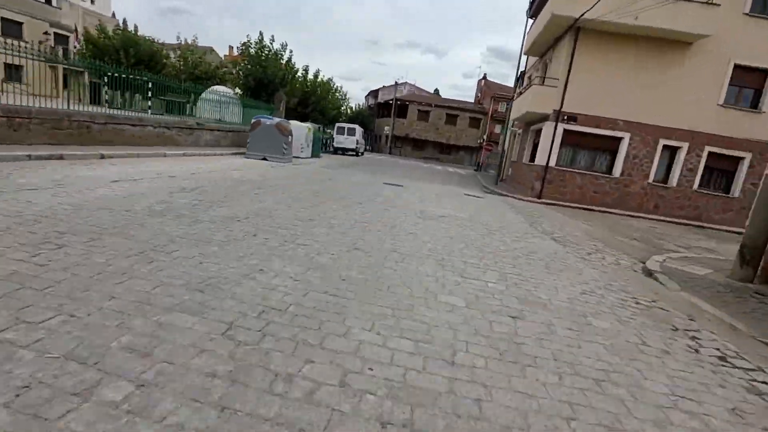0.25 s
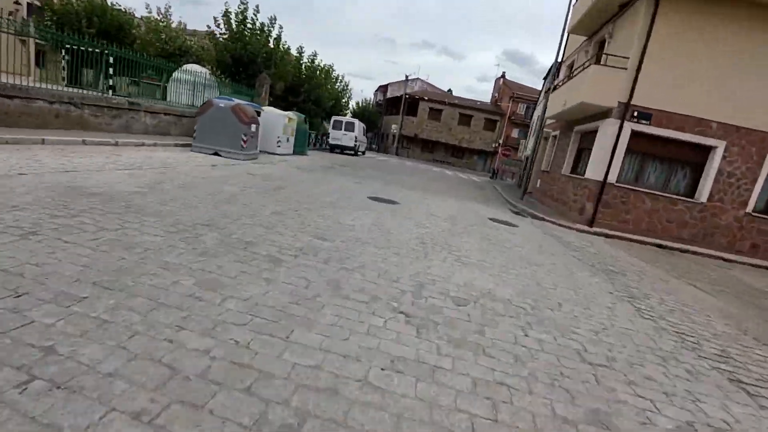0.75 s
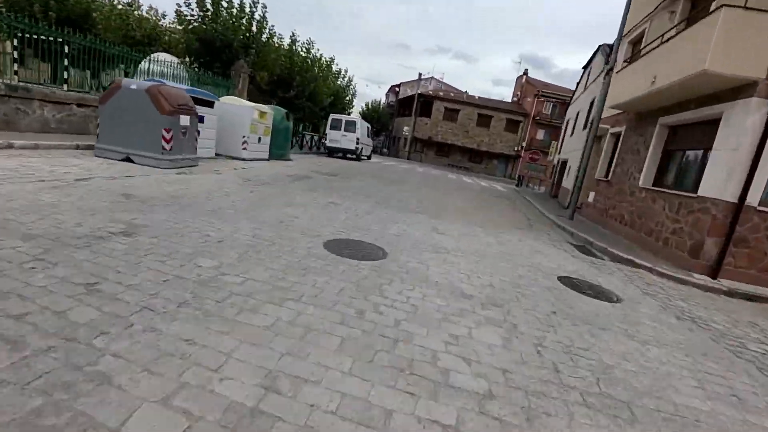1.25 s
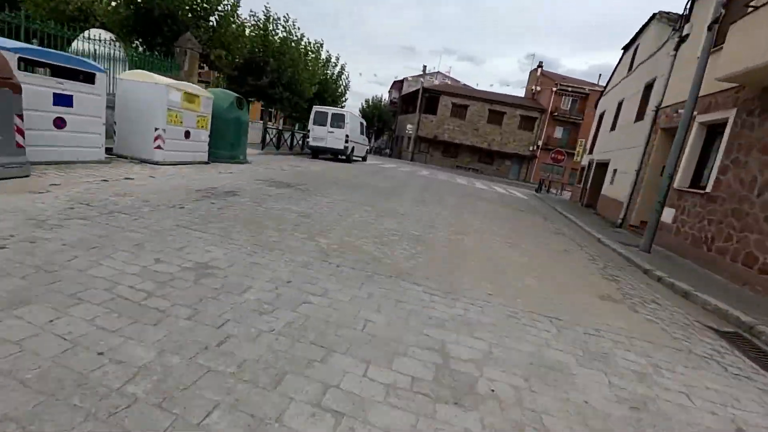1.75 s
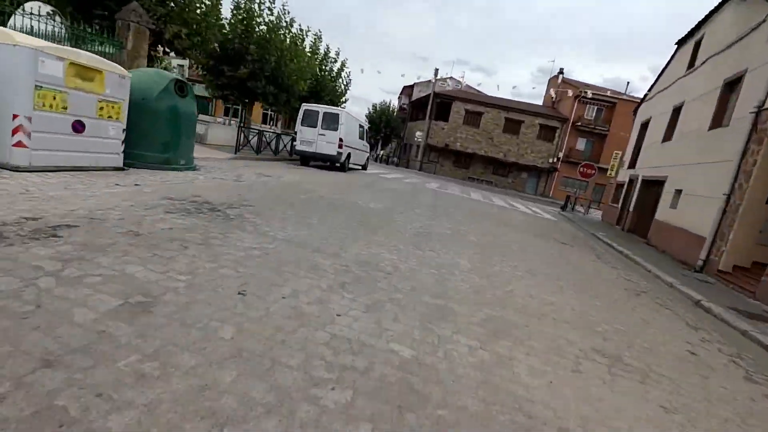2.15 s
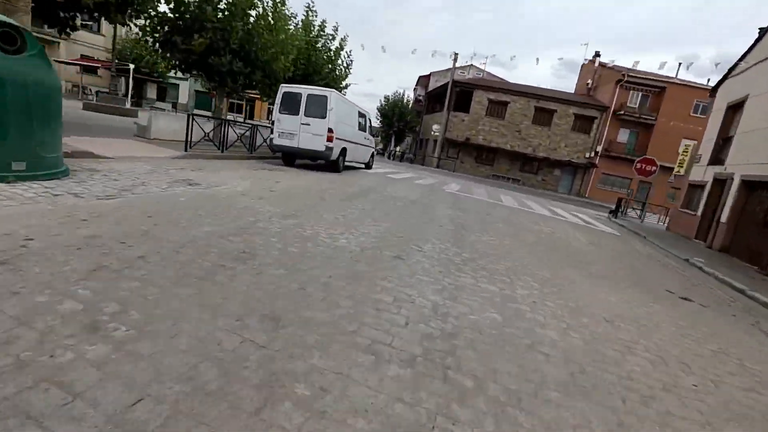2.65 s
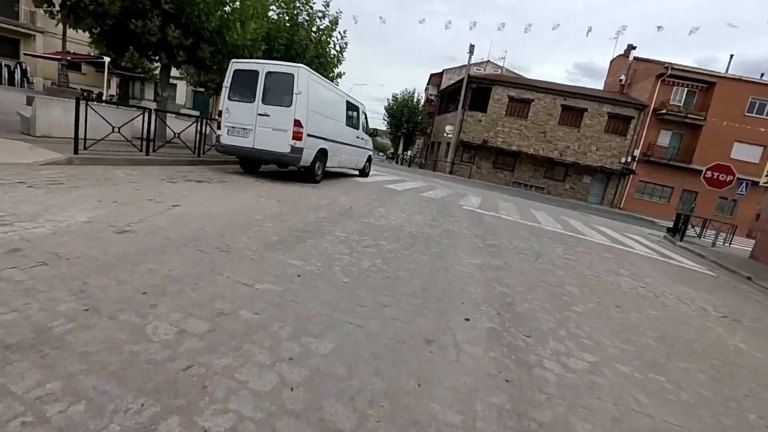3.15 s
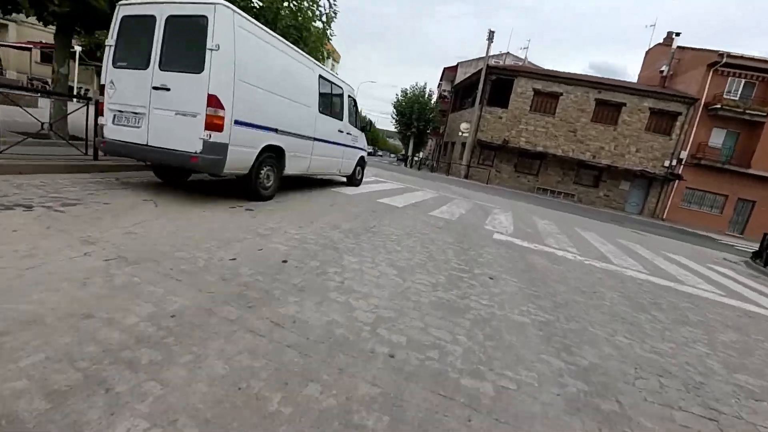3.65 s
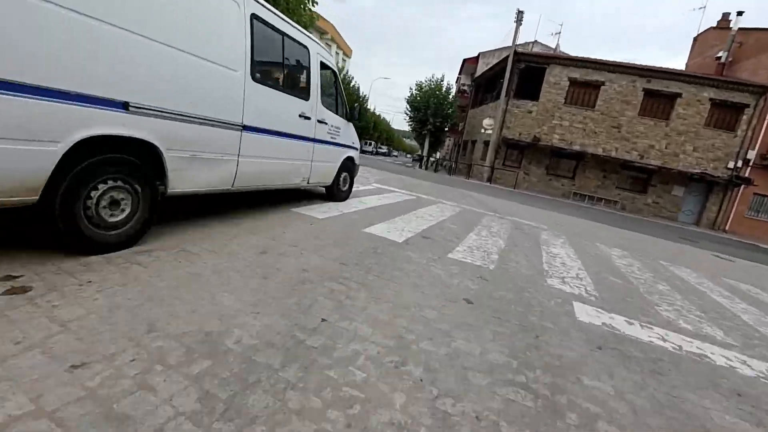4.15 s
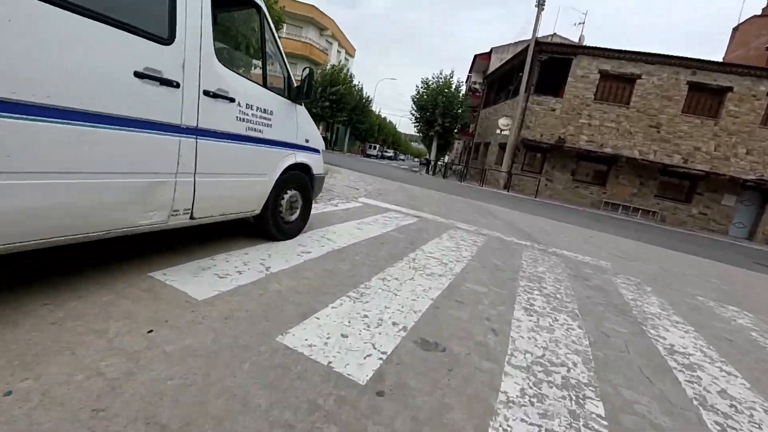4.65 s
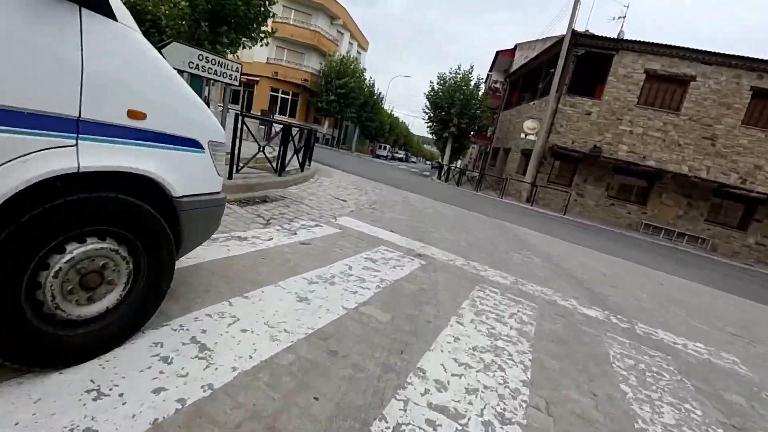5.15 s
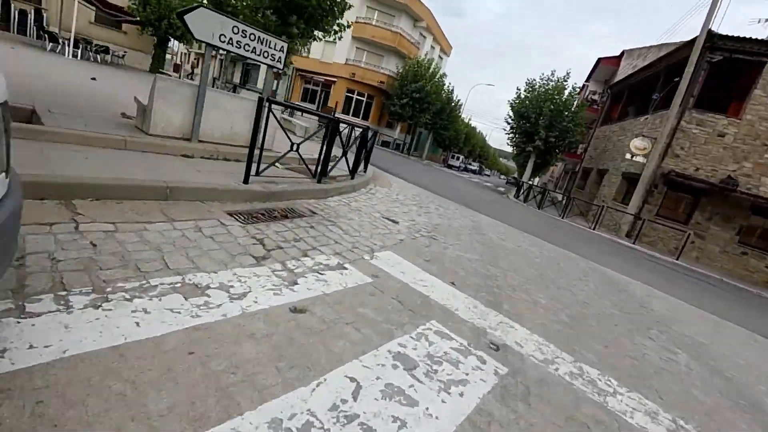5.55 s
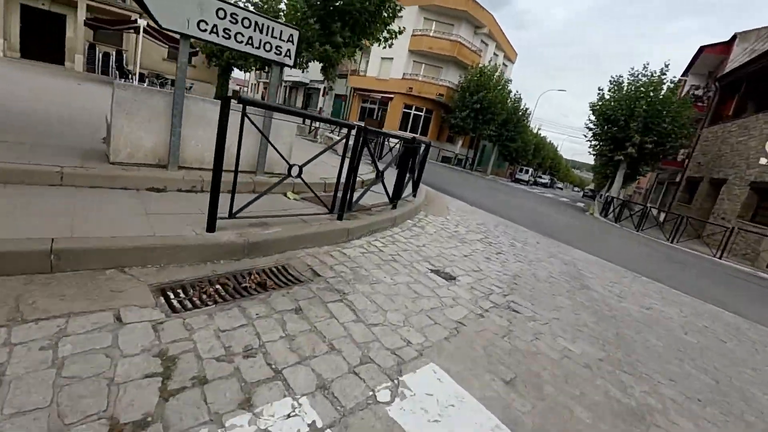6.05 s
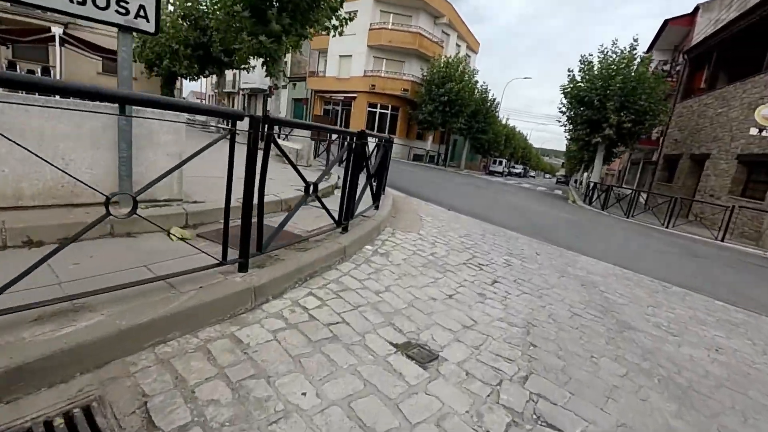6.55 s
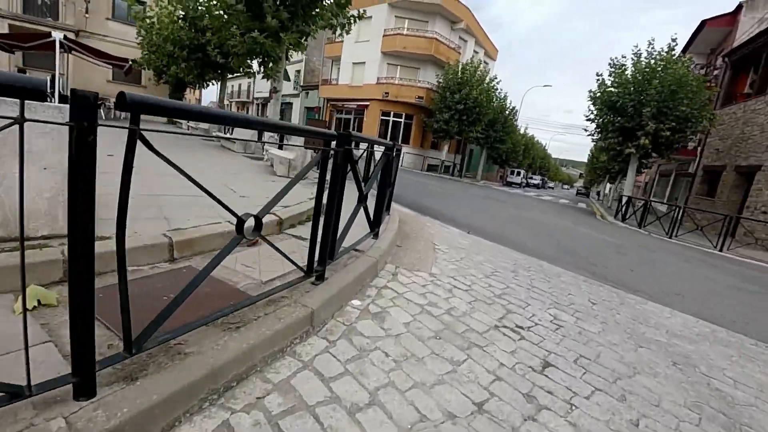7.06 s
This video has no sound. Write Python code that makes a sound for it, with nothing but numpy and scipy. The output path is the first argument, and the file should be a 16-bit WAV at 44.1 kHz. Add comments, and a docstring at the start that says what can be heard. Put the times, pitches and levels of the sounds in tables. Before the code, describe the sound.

A bicycle coasts over cobblestones with rumbling tyres, a ticking freewheel and wind on the microphone, clacks sharply over bumps, then slows.

```python
"""A bicycle coasts down a cobbled street and slows, heard from a camera on its handlebar.
From the start the stones shake the fork and camera mount, the tyres roar, the hub whirrs, the freewheel
ticks and wind pushes on the microphone. Fittings jingle, grit pings and a parked vehicle throws sound back.
After two seconds, two bumps make loose parts clack, with a creak between them; then the chain chatters.
Later a second parked vehicle goes by and the chain chatters again, as the ticks slow and the roar fades."""
import sys
import numpy as np
from scipy import signal
from scipy.fft import rfft, irfft, next_fast_len
from scipy.io import wavfile
from scipy.ndimage import map_coordinates

SR = 44100
rng = np.random.default_rng(int(sys.argv[2]) if len(sys.argv) > 2 else 0)


def to_wav(sig):
    """Store sig (one row per channel, or 1-D mono) as 16-bit WAV at the path in sys.argv[1].

    Samples outside -1..1 are clipped; the rate is SR.
    """
    pcm = np.clip(np.atleast_2d(sig), -1, 1) * 32767
    pcm = np.round(pcm).astype(np.int16)
    wavfile.write(sys.argv[1], SR, pcm.T)  # frames by channels


N = 322017
# Speed 1 means this many freewheel ticks a second. Each growth_db is added per doubling of the speed.
CRUISE_RATE = 50


def amp(db):
    """Turn decibels into a number to multiply by."""
    return 10 ** (np.asarray(db) / 20)


def unit(x):
    """Scale x to an average strength (rms) of 1."""
    return x / np.sqrt(np.mean(x ** 2) + 1e-20)


def curves(rows):
    """Turn rows that start with a time into one curve for each other column."""
    times, *columns = np.transpose(rows)
    return [np.interp(np.arange(N) / SR, times, column) for column in columns]


def wobble(rate):
    """A smooth random curve through rate points a second."""
    return map_coordinates(rng.standard_normal(int(N * rate / SR) + 4), [np.arange(N) * rate / SR])


def hump(at_s, half_s, height):
    """A smooth rise and fall around the time at_s."""
    return height * np.exp(-((np.arange(N) / SR - at_s) / half_s) ** 2)


def filtered(x, response):
    """Multiply each frequency in x by response(hz)."""
    size = next_fast_len(len(x) + SR // 2)
    return irfft(rfft(x, size) * response(np.fft.rfftfreq(size, 1 / SR)), size)[:len(x)]


def softened(x, corner_hz, steepness):
    """Turn down the frequencies above corner_hz."""
    return filtered(x, lambda hz: 1 / (1 + (hz / corner_hz) ** steepness))


def coloured(x, points):
    """Shape the tone of x along (Hz, dB) points, at strength 1."""
    point_hz, db = np.transpose(points)
    return unit(filtered(x, lambda hz: amp(np.interp(np.log(hz + 1), np.log(point_hz), db))))


def resonate(x, modes):
    """Let x set off ringing tones, each given as (pitch in Hz, width in Hz, dB)."""
    def response(hz):
        return sum((-1) ** k * amp(db) * 1j * hz * width / (pitch ** 2 - hz ** 2 + 1j * hz * width)
                   for k, (pitch, width, db) in enumerate(modes))
    return filtered(x, response)


def noise():
    """Fresh white noise."""
    return rng.standard_normal(N)


def jolts(rate):
    """Random pushes of random size, about rate a second."""
    return (rng.random(N) < rate / SR) * noise()


def steady(x, span_s):
    """Even out the swells in x that last longer than span_s."""
    window = signal.windows.hann(int(span_s * SR))
    power = signal.fftconvolve(x ** 2, window / window.sum(), "same")
    return x / np.sqrt(np.abs(power) + 1e-20)


def raised_stones(rise_s=0.056, fall_s=0.047):
    """Raised stones jolt the bicycle harder: two curves of extra dB, for the fork and the mount."""
    # Each row: time in seconds, change of the fork's thud in dB, change of the mount's drone in dB.
    stones = [(.24, 3, 0.5), (.42, 1, 2.5), (.63, 5.5, -1.5), (.81, 10, -2.5), (1.07, 9, 2.5),
              (1.41, 10.5, 2), (1.65, 13, 3.5), (1.89, 8, 2.5), (2.16, 7, 3.5), (2.36, 9, 0),
              (2.52, 6, 2.5), (2.7, -5, -1), (2.76, 9, -1), (3.78, 5, 4), (3.98, -6, 5.5),
              (4.14, 4.5, -1.5), (4.34, 0, 4), (4.45, 7, 0), (4.57, 1.5, 1), (4.94, 5, 2), (5.68, 2, 3),
              (5.98, -7, 3), (6.15, 6, -2), (6.48, 5.5, 1), (6.82, 15.5, 4.5)]
    times, *lifts = np.transpose(stones)
    clock = np.arange(0, N, 100) / SR
    since = clock - times[:, None]
    swells = np.exp(-(since / np.where(since < 0, rise_s, fall_s)) ** 2)
    return curves(np.column_stack([clock, *(np.array(lifts) @ swells)]))


def fine_paving(drone, start_s=2.4, end_s=6.25, blend_s=0.2, low_db=-3, high_db=0.3):
    """A stretch of finer paving takes some bass out of the drone."""
    t = np.arange(N) / SR
    share = (np.tanh((t - start_s) / blend_s) - np.tanh((t - end_s) / blend_s)) / 2
    low = softened(drone, corner_hz=230, steepness=10)
    return amp(low_db * share) * low + amp(high_db * share) * (drone - low)


def cobbles(speed, fork_db=-30, fork_growth_db=5.5, mount_db=-24, mount_growth_db=8.5, jolt_rate=2100):
    """The edges of the stones jolt both wheels; the fork thuds and the camera mount drones."""
    # How the fork and the mount ring. Each row: pitch in Hz, width in Hz, level in dB.
    fork_tones = [(67.5, 5.9, 21), (89, 66, -7)]
    mount_tones = [(187.4, 21.4, 1.5), (269.4, 21.3, 1), (309.2, 23.6, 0.5), (385.7, 61, -9.5),
                   (443, 41, -11.5)]
    fork_lift, mount_lift = raised_stones()
    thud_db = fork_db + fork_growth_db * np.log2(speed) + fork_lift + 2 * wobble(15)
    drone_db = mount_db + mount_growth_db * np.log2(speed) + mount_lift + 1.13 * wobble(12)
    # The soft tyre rounds off every jolt.
    thud = softened(resonate(jolts(jolt_rate * speed), fork_tones), corner_hz=125, steepness=4)
    drone = softened(resonate(jolts(jolt_rate * speed), mount_tones), corner_hz=560, steepness=6)
    # Stiff parts hardly move below their own pitches.
    thud = steady(filtered(thud, lambda hz: hz ** 4 / (hz ** 4 + 48 ** 4)), span_s=0.12)
    drone = steady(filtered(drone, lambda hz: hz ** 8 / (hz ** 8 + 150 ** 8)), span_s=0.16)
    return amp(thud_db) * thud + amp(drone_db) * fine_paving(drone)


def tyres(speed, echo_db, roar_db=-34, roar_growth_db=9.5, ring_db=-42.5, hiss_db=-47):
    """Tread slaps the stone: a grainy roar, a narrow ring and a fine hiss, shaken by the uneven road."""
    # The tone of the roar and of the hiss. Each row: frequency in Hz, level in dB.
    roar_shape = [(90, -25), (130, -2), (400, 2), (520, -2), (640, 0.5), (820, -3.5), (1100, -2),
                  (1600, -9.5), (2000, -17.5), (4000, -24), (9000, -65)]
    hiss_shape = [(900, -3.5), (1700, 4), (2600, -1.5), (3650, 0.5), (4650, 1.5), (5400, -3), (6500, -6.5),
                  (7250, -9.5), (8900, -17.5), (10000, -19), (12500, -20.5), (15500, -26)]
    # The ring that the tread sets off. Each row: pitch in Hz, width in Hz, level in dB.
    tread_tones = [(1378, 109, 1), (1502, 120, -0.5), (630, 24, -10.5)]
    doublings, road = np.log2(speed), wobble(45)
    fork_lift, _ = raised_stones()
    roar_level = roar_db + roar_growth_db * doublings + 0.05 * echo_db + 0.11 * fork_lift
    ring_level = ring_db - 0.1 * doublings + echo_db + 1.7 * wobble(11)
    hiss_level = hiss_db - 0.1 * doublings + 0.38 * echo_db
    roar = amp(roar_level + 0.5 * road) * steady(coloured(jolts(7500 * speed), roar_shape), span_s=0.17)
    ring = amp(ring_level + 0.5 * road) * steady(resonate(noise(), tread_tones), span_s=0.12)
    hiss = amp(hiss_level + 0.7 * road + 0.52 * wobble(150)) * coloured(noise(), hiss_shape)
    return roar + ring + hiss


def bearings(speed, echo_db, level_db=-51, growth_db=1, flutter_db=1.5):
    """The rolling balls keep the hub ringing in a thin whirr."""
    # How the hub and frame ring. Each row: pitch in Hz, width in Hz, level in dB.
    hub_tones = [(2470, 110, -5.5), (3963, 88, 4), (4610, 250, -5.5), (5920, 90, -11), (6980, 59, -8),
                 (7370, 90, -8.5), (8160, 100, -14)]
    level = level_db + growth_db * np.log2(speed) + 0.85 * echo_db + flutter_db * wobble(30)
    return amp(level) * unit(resonate(noise(), hub_tones))


def freewheel(tick_rate, level_db=-46.5, growth_db=4, rise_s=0.0005, decay_s=0.0076, ping_db=-7):
    """Small steel catches drop into a toothed ring, tooth by tooth, each with a rasp and a ping."""
    # The tone of the rasp. Each row: frequency in Hz, level in dB.
    rasp_shape = [(900, 3.5), (1800, -0.5), (2700, 4.5), (3600, 4.5), (4250, 2), (4700, -0.5), (5600, -5),
                  (6500, -8), (7300, -5.5), (8900, -30), (10000, -12.5), (14000, -56)]
    # How the catches ring. Each row: pitch in Hz, width in Hz, level in dB.
    ping_tones = [(4600, 180, -1), (4870, 146, -2.5)]
    dip_db = hump(at_s=2.585, half_s=0.05, height=12)  # the ticking sinks between the two bumps
    level = level_db + growth_db * np.log2(tick_rate / CRUISE_RATE) - dip_db
    t = np.arange(SR // 20) / SR
    stroke = (1 - np.exp(-t / rise_s)) * np.exp(-t / decay_s)
    teeth_passed = np.floor(np.cumsum(tick_rate) / SR)
    drops = np.diff(teeth_passed, prepend=0) * amp(1.4 * noise())
    strokes = steady(signal.fftconvolve(drops, stroke)[:N], span_s=0.47)
    ping = sum(resonate(drops * rng.uniform(-0.97, 1, N), [tone]) for tone in ping_tones)
    ping = unit(softened(ping, corner_hz=5800, steepness=8))
    return amp(level) * (strokes * coloured(noise(), rasp_shape) + amp(ping_db) * ping)


def wind(speed, level_db=-30.5, growth_db=15, gust_db=2.5):
    """Swirling air pushes on the microphone and dies away quickly as the bicycle slows."""
    # The tone of the wind's rumble. Each row: frequency in Hz, level in dB.
    rumble_shape = [(10, -8), (25, 9), (45, 11), (80, 27), (110, 16), (160, 12.5), (300, -26), (900, -46)]
    level = level_db + growth_db * np.log2(speed) + gust_db * wobble(8.3)
    return amp(level) * steady(coloured(noise(), rumble_shape), span_s=0.28)


def jingle(speed, level_db=-55, growth_db=2, swell_db=3, touch_rate=130):
    """Small fittings touch at random, more loudly when a raised stone shakes the fork harder."""
    # How the fittings ring. Each row: pitch in Hz, width in Hz, level in dB.
    fitting_tones = [(2710, 200, 14), (3090, 220, -3.5), (1960, 270, -10), (4200, 400, 6.5)]
    fork_lift, _ = raised_stones()
    level = level_db + growth_db * np.log2(speed) + 0.23 * fork_lift + swell_db * wobble(7.4)
    ring = resonate(jolts(touch_rate), fitting_tones)
    return amp(level) * unit(softened(ring, corner_hz=5500, steepness=8))


def grit(fade_s=0.0048):
    """Grains of sand flick against the camera, each with a very bright ping and a dry tap."""
    # Each row: time in seconds, peak level in dB.
    grains = [(.409, -40), (.7048, -28.5), (.783, -39), (.913, -41), (1.606, -39), (1.892, -40),
              (3.518, -40), (3.661, -39)]
    ping, tap = (11400, 1500, 0), (5500, 5000, -7)  # pitch in Hz, width in Hz, level in dB
    out, t = np.zeros(N + SR), np.arange(SR // 50) / SR
    for start, db in grains:
        burst = rng.standard_normal(len(t)) * amp(-60 * t / fade_s)
        tick = resonate(burst, [ping, tap])
        out[round(start * SR):][:len(t)] += amp(db) * tick / np.abs(tick).max()
    return out[:N]


def knocks(ring_db=-9, crack_db=-13, mount_hz=250, case_hz=345, bounce_s=0.0065, bounce_loss_db=14):
    """Each blow cracks, rings the loose parts and thumps the mount and camera case, then bounces once."""
    # Each row: time in seconds, clack level in dB, thump level in dB, brightness in dB per octave.
    blows = [(1.552, -19.5, -38, 3), (2.2694, -21, -15, 2), (2.2806, 1, -28, 0.5), (2.2822, -2, -3, 1.5),
             (2.456, -16.5, -32, 1), (2.4683, -22, -38, 12), (2.5103, -14.5, -16, 1.5),
             (2.697, -17.5, -8.5, -6), (2.7094, -12.5, -13, -3), (3.21, -17, -38, -2),
             (3.387, -27, -41, -1), (3.479, -23, -38, 2.5), (5.0248, -24.5, -40, -3),
             (5.4741, -22, -42, -2), (5.802, -25, -42, 2)]
    # How the loose parts ring. Each row: pitch in Hz, level in dB, seconds to fade by 60 dB.
    clack_tones = [(743, -5, 0.039), (903, -5.5, 0.032), (1390, -1.5, 0.022), (1487, 3.5, 0.02),
                   (1900, -3, 0.012), (2180, -3, 0.018), (2560, -14, 0.027), (3080, -8.5, 0.024),
                   (3650, -8, 0.034), (3720, -4.5, 0.016), (4543, -7.5, 0.033), (5500, -13, 0.019),
                   (7030, -11.5, 0.0089), (7830, -25, 0.017), (8150, -27, 0.013)]
    out, lead = np.zeros(N + SR), SR // 100
    t = np.maximum(np.arange(SR // 5) - lead, 0) / SR
    tone_hz, tone_db, fade_s = np.transpose(clack_tones)[:, :, None]
    thump = np.sin(2 * np.pi * mount_hz * t) + np.sin(2 * np.pi * case_hz * t)
    thump *= amp(-60 * t / 0.068) * (1 - np.exp(-t / 0.0022))
    bounces = [(start + bounce_s, clack_db - bounce_loss_db, thump_db - bounce_loss_db, brightness)
               for start, clack_db, thump_db, brightness in blows]
    for start, clack_db, thump_db, brightness in blows + bounces:
        # Every blow lands on a slightly different spot.
        strength = amp(tone_db + rng.standard_normal(tone_hz.shape)) * rng.choice([-1, 1], tone_hz.shape)
        pitch = tone_hz * rng.uniform(0.98, 1.02, tone_hz.shape)
        ring = np.sum(strength * amp(-60 * t / fade_s) * np.sin(2 * np.pi * pitch * t), axis=0)
        hiss = unit(softened(rng.standard_normal(len(t)), corner_hz=4200, steepness=3.8))
        crack = hiss * amp(-60 * t / 0.03)
        clack = (amp(ring_db) * ring + amp(crack_db) * crack) * (1 - np.exp(-t / 0.00008))
        # Each blow has its own brightness, from a dull clack to a sharp click.
        clack = filtered(clack, lambda hz: amp(brightness * np.log2(np.clip(hz, 900, 12000) / 2500)))
        out[round(start * SR) - lead:][:len(t)] += amp(clack_db) * clack + amp(thump_db) * thump
    return out[:N]


def creak(start_s=2.335, end_s=2.402, pitch_hz=296, rise_hz=36, level_db=-27, rough_db=2.7, overtones=34):
    """A joint, strained by the bump, sticks and slips in a short buzz that swells and rises in pitch."""
    # The tone of the creaking part. Each row: frequency in Hz, level in dB.
    creak_shape = [(600, -8), (1200, -1), (1850, 5), (2150, 4), (2400, 11), (2750, -2), (3350, -5),
                   (3800, 6.5), (4150, 1), (4520, -2), (5000, -5), (5500, -8), (6200, -15), (7300, -19),
                   (12000, -45)]
    t = np.arange(N) / SR
    progress = np.clip((t - start_s) / (end_s - start_s), 0, 1)
    sliding = (progress > 0) & (progress < 1)
    slip_rate = (pitch_hz + rise_hz * progress ** 2) * (1 + 0.012 * wobble(400))
    slips = np.cumsum(slip_rate[sliding]) / SR
    # The tubing smears each slip, so the overtones fall out of step.
    cycles = np.arange(1, overtones + 1)[:, None] * slips + rng.random((overtones, 1))
    buzz = np.zeros(N)
    buzz[sliding] = np.sin(2 * np.pi * cycles).sum(0)
    buzz = coloured(buzz, creak_shape)
    swell = np.clip((t - start_s) / 0.021, 0, 1) ** 2 * np.clip((end_s - t) / 0.0092, 0, 1)
    return amp(level_db + rough_db * wobble(280)) * swell * buzz / buzz[sliding].std()


def chain_rattle(contact_rate=500):
    """After the second bump, and again later, the chain chatters in a flurry of tiny hits."""
    # Each row: start in seconds, length in seconds, level in dB.
    rattles = [(2.67, 0.18, -37), (5.398, 0.5, -46)]
    t = np.arange(N) / SR
    swell = sum(amp(db) * np.sqrt(np.abs(np.sin(np.pi * np.clip((t - start) / length, 0, 1))))
                for start, length, db in rattles)
    chatter = signal.fftconvolve(jolts(contact_rate), rng.standard_normal(SR // 300))[:N]
    return swell * unit(softened(chatter, corner_hz=3800, steepness=4))


def scene():
    """Add up the sounds; the wheel speed sets the pace of ticks and jolts and most rolling levels."""
    # The wheel speed. Each row: time in seconds, freewheel ticks per second.
    tick_rates = [(0, 59), (.95, 57.3), (1.4, 52.6), (2.1, 48), (3.1, 50.5), (3.5, 45.5), (4.7, 37.5),
                  (5.4, 29.6), (5.8, 28), (6.85, 17.6), (7.3, 17.5)]
    # Parked vehicles throw the tyre and hub sound back.
    # Each row: time alongside in seconds, half the length of the pass in seconds, boost in dB.
    parked_vehicles = [(.42, 0.16, 3), (4.75, 0.8, 3.5)]
    tick_rate, = curves(tick_rates)
    speed = tick_rate / CRUISE_RATE
    echo_db = sum(hump(*vehicle) for vehicle in parked_vehicles)
    rolling = cobbles(speed) + tyres(speed, echo_db) + bearings(speed, echo_db)
    rolling *= amp(-hump(at_s=2.615, half_s=0.05, height=3.5))  # a brief dip between the two bumps
    coasting = rolling + freewheel(tick_rate) + wind(speed) + jingle(speed)
    return (coasting + grit() + knocks() + creak() + chain_rattle())[None]


def record(dry, top_hz=15300):
    """The camera rounds off the highest peaks and keeps nothing above top_hz."""
    rounded = dry[0] / (1 + dry[0] ** 8) ** (1 / 8)
    return filtered(rounded, lambda hz: hz < top_hz)[None]


dry = scene()
out = record(dry)
to_wav(out)
```